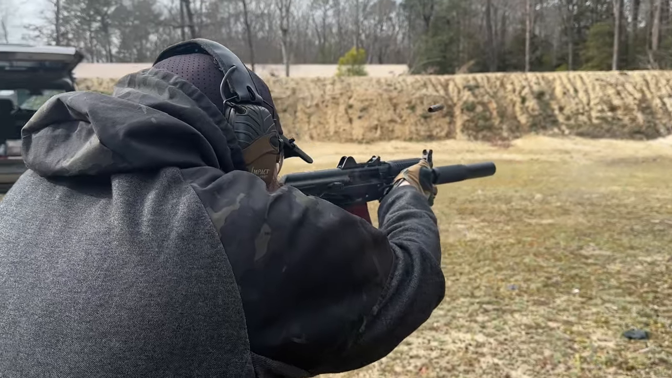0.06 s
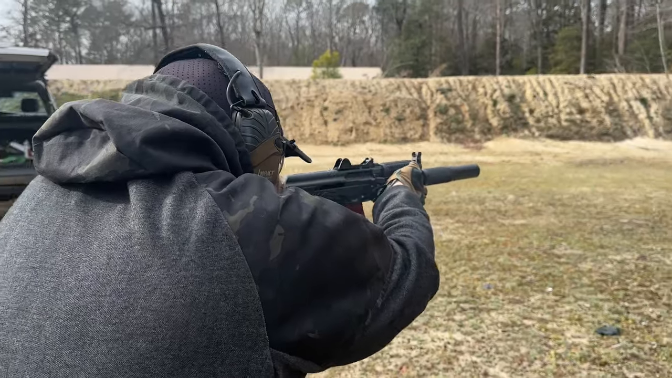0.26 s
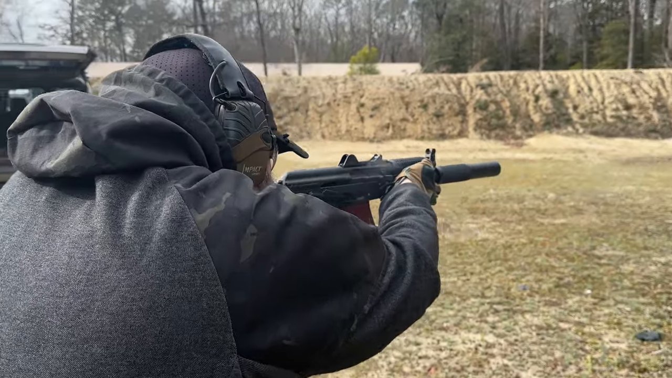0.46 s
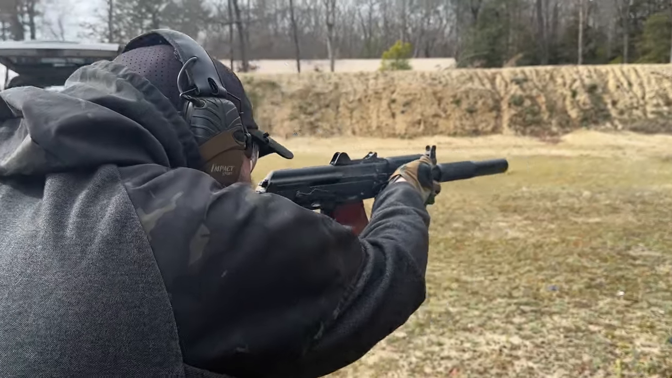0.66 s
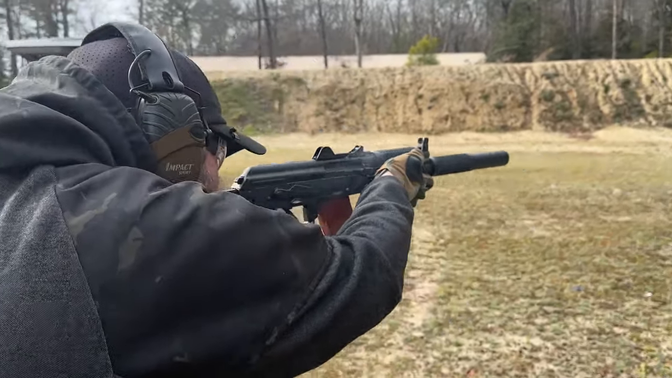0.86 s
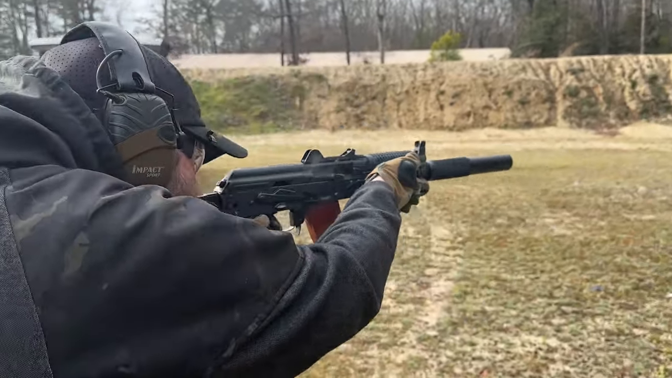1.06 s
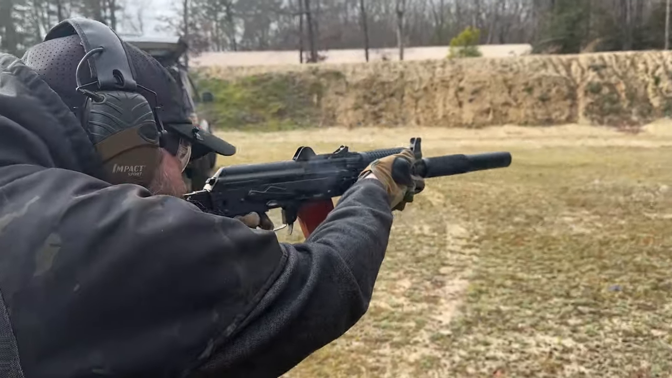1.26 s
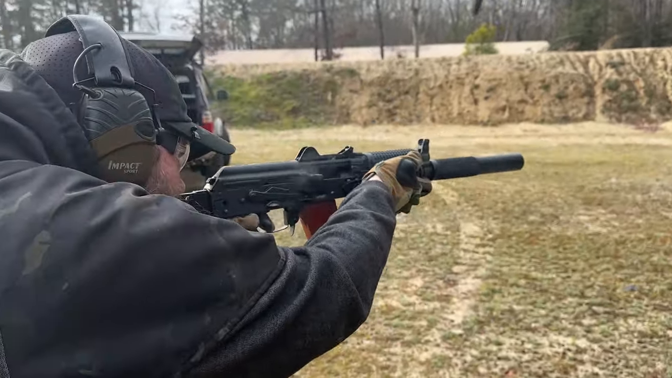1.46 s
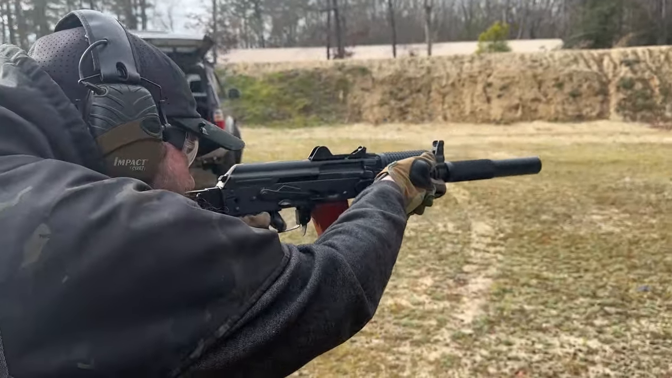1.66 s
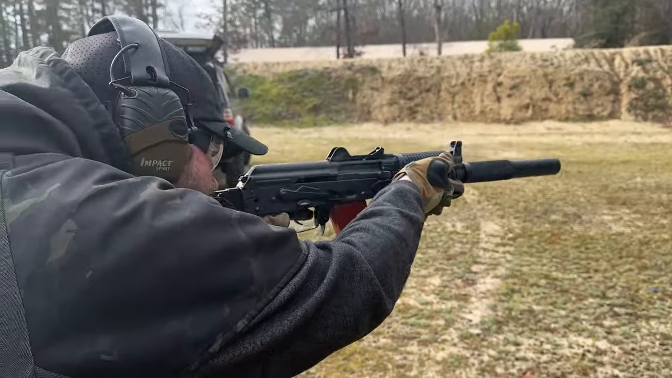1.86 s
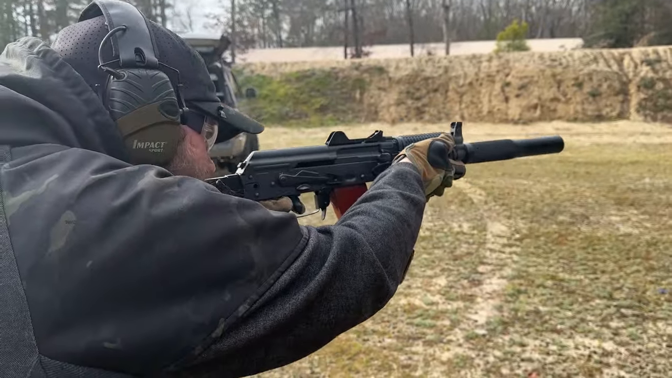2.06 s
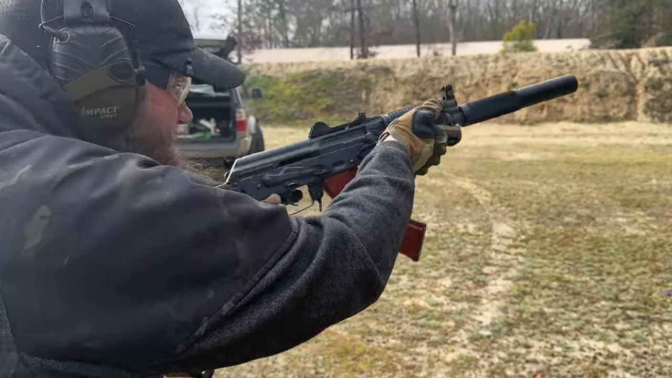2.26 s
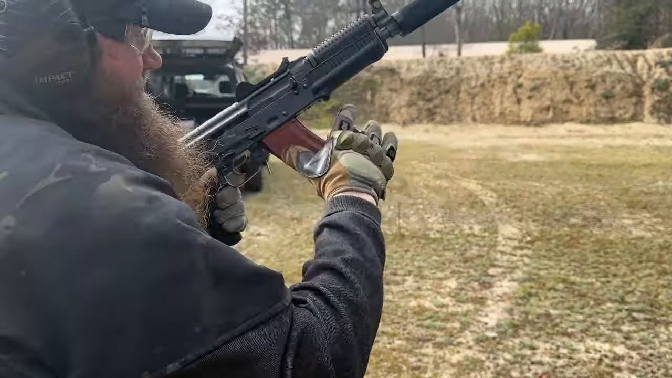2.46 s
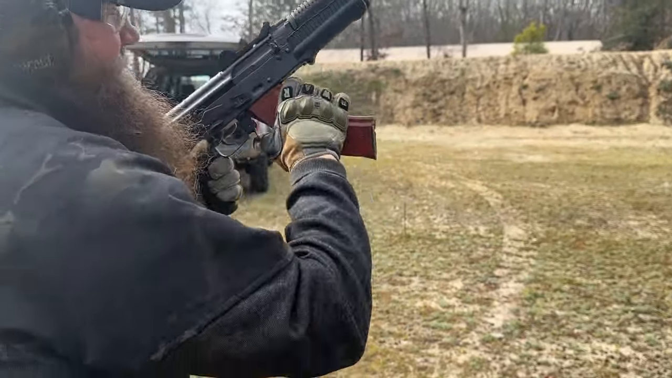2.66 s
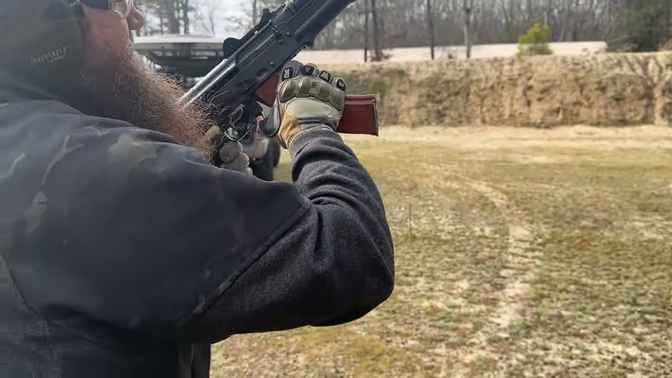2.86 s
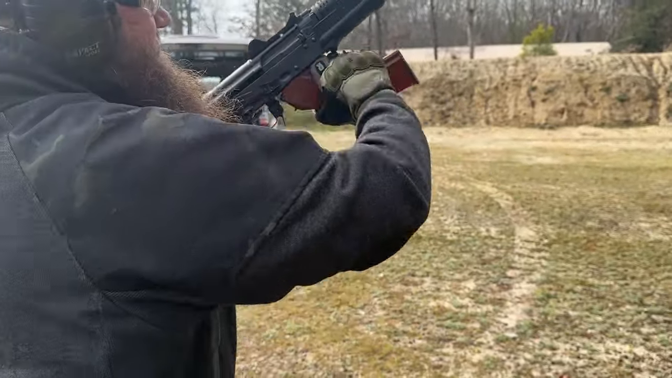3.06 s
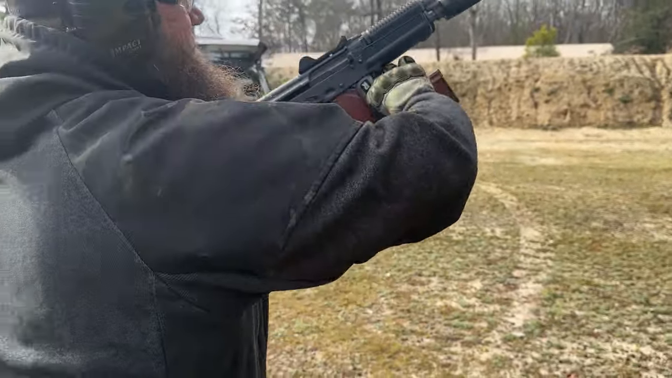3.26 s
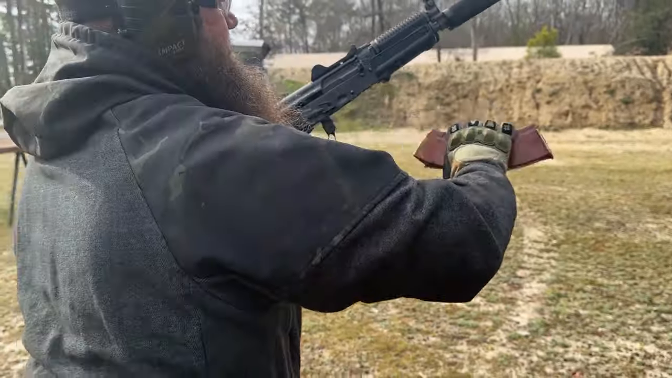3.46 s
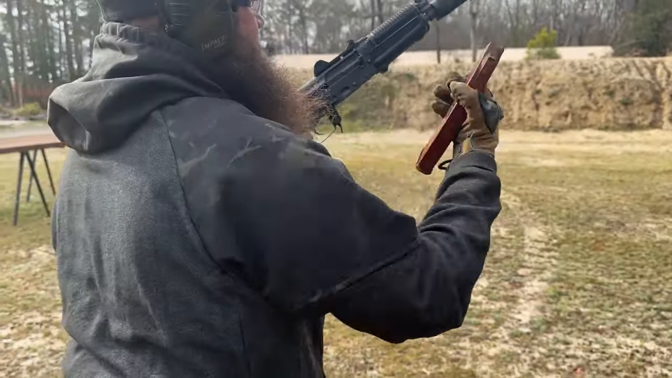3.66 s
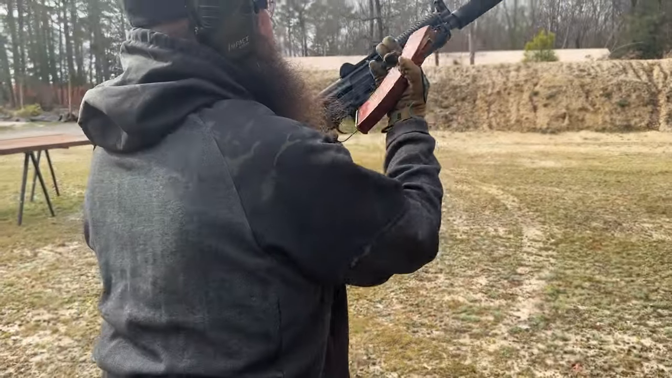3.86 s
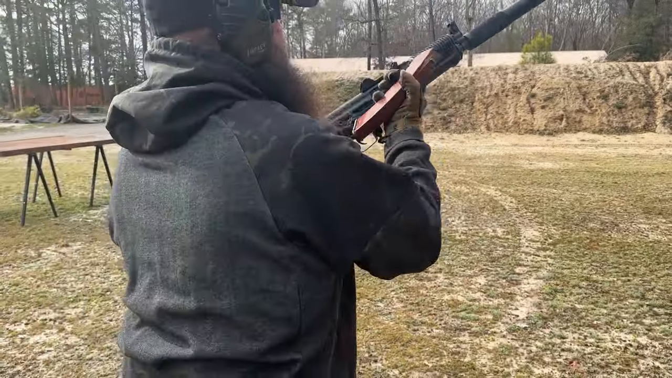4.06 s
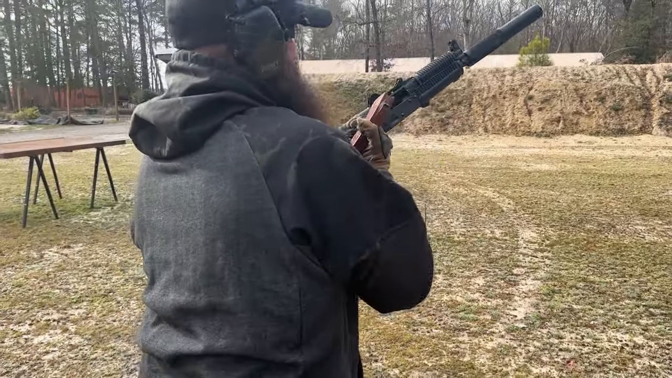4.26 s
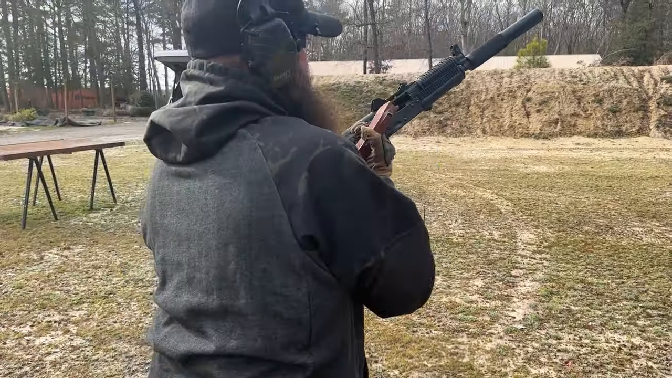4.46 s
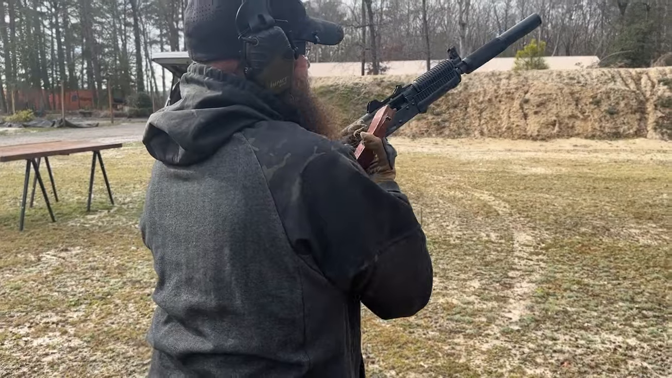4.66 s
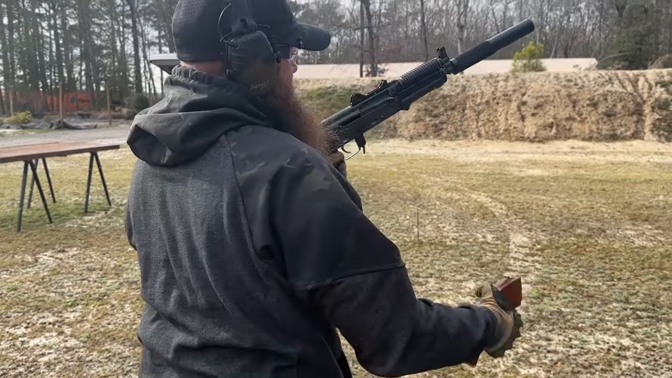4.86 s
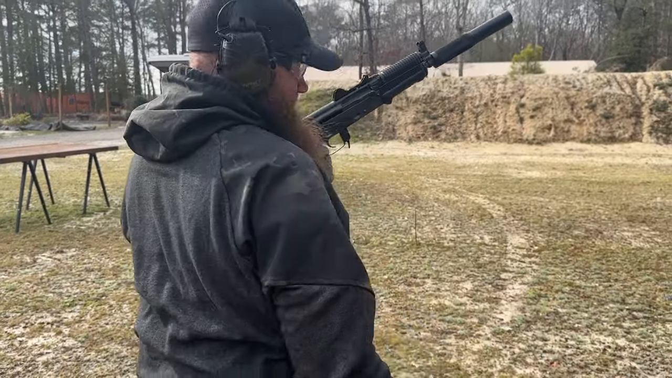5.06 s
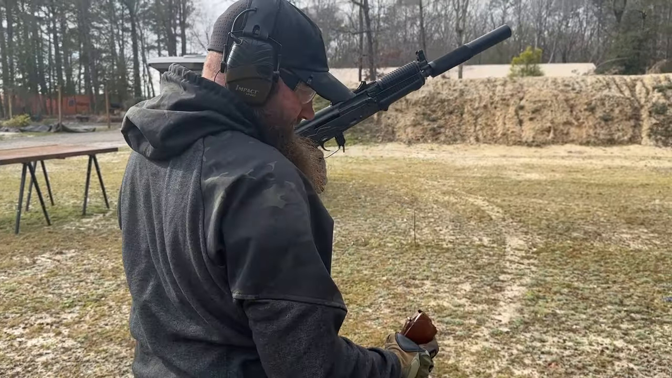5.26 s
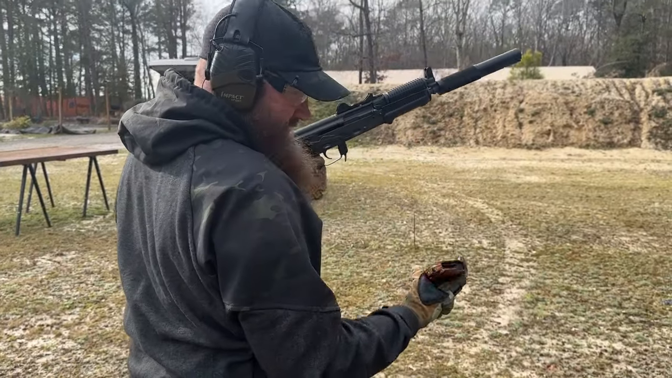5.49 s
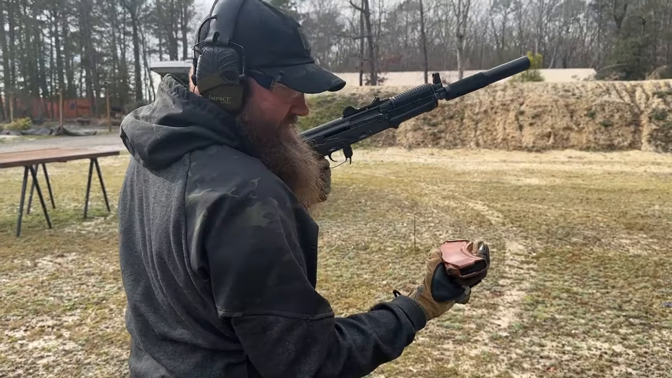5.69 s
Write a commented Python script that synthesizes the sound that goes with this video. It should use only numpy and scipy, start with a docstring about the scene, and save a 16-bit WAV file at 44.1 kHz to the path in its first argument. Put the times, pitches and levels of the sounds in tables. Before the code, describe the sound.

Seven rapid rifle shots overload a close microphone and echo off trees, followed by dry clicks, a magazine knock and two metallic bolt pulls.

```python
"""Suppressed rifle on an open range

Seven quick shots, each a blast, a hiss of gas and a cycling bolt, badly overload a close microphone.
Earth banks throw each shot back and the woods roll on for seconds. The action clicks empty, the
magazine is knocked loose and pulled out, and the bolt is racked twice, while sleeves rustle in still air.
The sound opens on a quieter snatch of a shot and a short silent gap."""
import sys
import numpy as np
from scipy import signal
from scipy.fft import irfft, next_fast_len
from scipy.io import wavfile
from scipy.ndimage import uniform_filter1d

SR = 44100
rng = np.random.default_rng(int(sys.argv[2]) if len(sys.argv) > 2 else 0)


def wav_record(signal):
    """Record a signal, one row per channel, as 16-bit PCM in the file named by sys.argv[1]."""
    frames = np.transpose(np.atleast_2d(signal))
    bounded = np.clip(frames, -1, 1)
    # unit amplitude maps onto the largest positive 16-bit level
    quanta = np.round(bounded * 32767).astype(np.int16)
    wavfile.write(sys.argv[1], SR, quanta)


N = 252648
TIME = np.arange(N) / SR

# the shots, starting with the opening snatch: t/s, level/dB
SHOTS = [(-.009, 0.5), (0.1846, -1.5), (0.383, -2.5), (0.601, -0.5), (.773, -3.5), (1.0141, -4),
         (1.2057, -3), (1.4244, -0.5)]
# notes of the parts that the moving bolt sets ringing: f/Hz, level/dB, time to fade 60 dB/s
CARRIER_NOTES = [(2595, -4, 0.34), (4690, -4, 0.06), (7050, 0, 0.062), (9700, -5.5, 0.13)]
def gunfire(shared_db=-9.5, varied_db=-9, carrier_delay_s=.014):
    """Every shot meets the same ground, banks and trees, a little differently as the muzzle moves."""
    shared = woods_echo()
    add(shared, 0, amp(shared_db) * (blast() + bolt_thumps()))
    out = np.zeros(N)
    for s, db in SHOTS:
        add(out, s, amp(db) * shared)
        add(out, s, amp(db + varied_db) * (blast() + bolt_thumps()))
        add(out, s, amp(db) * gas_and_bolt_hiss())
        add(out, s + carrier_delay_s, amp(db) * ring(CARRIER_NOTES))
    return out


# routes of the blast, direct and off the banks: delay/s, level/dB, f/Hz, decay/s,
# time between repeats/s, loss at the first repeat/dB, pitch shift per repeat/octaves
BLAST_PATHS = [(.001, 15, 904.5, 0.0084, .019, 0.9, 0.21), (.043, 13, 435, 0.0092, .011, 4, -0.32),
               (.102, 11.5, 434, .008, 0.018, 3.5, -.3), (.141, 4, 821, .016, .02, 5, -0.59)]
def blast(arrivals=5, body_hz=195.4, body_db=-17, body_decay_s=.045):
    """On each route the blast flutters between nearby surfaces, fading ever faster, over a low boom."""
    out = np.zeros(SR // 2)
    for delay, db, hz, decay, every, loss_db, shift in BLAST_PATHS:
        for k in range(arrivals):
            add(out, delay + k * every, amp(db - k ** 2 * loss_db) * pulse(hz * 2 ** (k * shift), decay))
        add(out, delay, amp(db + body_db) * pulse(body_hz, body_decay_s))
    return out


# the bolt hits its rear stop, then its front one: t after the shot/s, rush level/dB, thump level/dB
BOLT_STOPS = [(0.03, 2, 8), (0.089, 9, 4.5)]
def bolt_thumps(hz=68, decay_s=.013, head_start_s=.006):
    """The bolt gives a deep thump at each end of its travel."""
    out = np.zeros(SR // 2)
    for delay, _, db in BOLT_STOPS:
        add(out, delay - head_start_s, amp(db) * pulse(hz, decay_s))
    return out


# tone of the gas jet's hiss: f/Hz, level/dB
JET_TONE = [(60, -22), (400, 2), (900, 0), (1600, 5), (3000, 4.5), (5000, -1.5), (8000, -7), (12000, -6.5),
            (16000, -10.5)]
def gas_and_bolt_hiss(jet_db=7, hold_s=.019, fall_db_per_s=169.5, rush_half_width_s=.0079):
    """The gas jet holds, then dies away, while the bolt rushes back and forth."""
    t = TIME[:SR // 3]
    power = amp(jet_db - fall_db_per_s * np.maximum(t - hold_s, 0)) ** 2
    for delay, rush_db, _ in BOLT_STOPS:
        power += amp(rush_db) ** 2 * np.exp(-((t - delay) / rush_half_width_s) ** 2)
    return np.sqrt(power) * noise(JET_TONE, len(t))


# tone and fading of the echo from the trees: f/Hz, level/dB, loss/(dB per s)
WOODS_TONE = [(30, -24.5, 2), (100, -16.5, 5.5), (200, -5, 7.5), (400, -1, 7.5), (650, -2, 7),
              (1030, -5.5, 7), (1800, -8.5, 9), (3140, -11, 20.5), (4900, -24, 28), (9250, -37.5, 35),
              (16000, -45, 33.5)]
def woods_echo(onset_s=.17, spreading=1.74):
    """One shot comes back from ever farther trees, thinning with distance and losing its treble."""
    hz, t, spectrum = signal.stft(rng.standard_normal(N), SR, nperseg=512)
    table = np.array(WOODS_TONE)
    tone = normalise(amp(look_up(table[:, [0, 1]], hz)))[:, None]
    loss_db = look_up(table[:, [0, 2]], hz)[:, None] * t
    echo = signal.istft(spectrum * tone * amp(-loss_db), SR, nperseg=512)[1][:N]
    distance = TIME / onset_s
    return echo * np.minimum(distance, 1) ** 2 / np.maximum(distance, 1) ** spreading


# tone of the rifle's clattering steel body: f/Hz, level/dB
CLATTER_TONE = [(60, -27.5), (350, -27.5), (750, -14.5), (1030, 2), (1800, 8.5), (3200, 4), (4500, -2.5),
                (8000, -7), (12000, -10), (16000, -20)]
def clack(tilt_db, decay_s, scatter_db=-29, scatter_s=.017):
    """Steel hits steel: a clatter that dies fast, then scatters off the shooter and the ground."""
    t = TIME[:8192]
    fade = np.exp(-t / decay_s) + amp(scatter_db) * np.exp(-t / scatter_s)
    return noise(CLATTER_TONE, len(t), tilt_db) * fade


# notes of the small levers inside: f/Hz, level/dB, time to fade 60 dB/s
LEVER_NOTES = [(1728, -14, 0.097), (2804, 0, 0.028), (3740, -10, 0.044), (4570, -17.5, 0.017),
               (5210, -16, 0.051), (5570, -8.5, 0.025), (8170, -16.5, .03)]
def with_levers(hit, ring_db):
    """A hit shakes the small levers, which add their ringing to it."""
    add(hit, 0, amp(ring_db) * ring(LEVER_NOTES))
    return hit


# the trigger resets between shots: t/s, level/dB
TRIGGER_RESETS = [(0.3209, 10.5), (0.535, 8), (0.7422, 11.5), (.928, 5), (1.1626, 7), (1.365, 6.5),
                  (1.5815, 8)]
# dry clicks of the hammer and catches: t/s, level/dB, treble tilt/(dB per octave)
HAMMER_CLICKS = [(1.629, 6.5, 4), (1.638, 4.5, 7), (1.7885, -10.5, -1), (1.9872, -21.5, 6.5),
                 (2.2126, -8.5, -.5), (2.757, -40.5, -3.5), (3.9125, -36, -2.5), (4.032, -42, -4),
                 (4.2572, -38.5, 7), (4.3091, -45, 3.5)]
def snaps(reset_tilt_db=2.5, decay_s=.0031):
    """Trigger, hammer and catches snap over and ring."""
    resets = [(s, db, reset_tilt_db) for s, db in TRIGGER_RESETS]
    out = np.zeros(N)
    for s, db, tilt_db in [*resets, *HAMMER_CLICKS]:
        snap = amp(-2) * clack(tilt_db, decay_s)
        add(out, s, amp(db) * with_levers(snap, ring_db=-3))
    return out


def knock(tilt_db, decay_s, hollow_hz, hollow_db):
    """A clack with a hollow note, which shakes the levers."""
    hit = clack(tilt_db, decay_s) + amp(hollow_db) * pulse(hollow_hz, decay_s, spread=2.2, size=8192)
    return with_levers(hit, ring_db=-21)


# knocks on the magazine: t/s, level/dB, treble tilt/(dB per octave), hollow note f/Hz, its share/dB
MAGAZINE_KNOCKS = [(2.4919, -18.5, -4, 1672, 9), (2.512, -24.5, -4.5, 1698, -14),
                   (2.8801, -29.5, -12, 1740, -13), (3.034, -27, -10.5, 1656, 7),
                   (3.040, -10, -5.5, 1583, 4), (3.046, 3.5, 2, 1500, -10.5),
                   (3.344, -32.5, -5.5, 1260, 14.5), (3.355, -22.5, -9.5, 1259, -2),
                   (5.188, -46.5, -15, 1143, 0)]
def magazine(decay_s=.0039):
    """The hollow magazine is knocked loose and bumps on its way out."""
    out = np.zeros(N)
    for s, db, tilt_db, hollow_hz, hollow_db in MAGAZINE_KNOCKS:
        add(out, s, amp(db) * knock(tilt_db, decay_s, hollow_hz, hollow_db))
    return out


# the bolt's carrier catches as it is racked (worked by hand) twice: t/s, level/dB
RACK_CATCHES = [(4.058, -34.5), (4.072, -10.5), (4.078, -9), (4.095, -7.5), (4.107, -6.5), (4.1301, -1),
                (4.143, 2.5), (4.687, -29.5), (4.7025, -10), (4.727, -8.5), (4.734, -6.5), (4.7446, -1.5),
                (4.756, -7), (4.766, 7), (4.775, 2.5)]
def racking(base_tilt_db=1.5, brightening=.1):
    """The carrier catches harder and harder along each stroke; a harder catch is brighter."""
    out = np.zeros(N)
    for s, db in RACK_CATCHES:
        tilt_db = base_tilt_db + brightening * db
        add(out, s, amp(db) * knock(tilt_db, decay_s=.0062, hollow_hz=1328, hollow_db=-6))
    return out


# notes of the rifle's steel and of its spring: f/Hz, level/dB, time to fade 60 dB/s
STEEL_NOTES = [(1350, -6, 0.13), (1880, -8.5, 0.12), (2126, -24, 0.78), (2680, -6.5, .09), (3360, 7.5, .12),
               (3460, 8.5, 0.13), (4000, -4.5, 0.099), (5180, 10.5, .07), (6400, -19.5, .1),
               (10890, -2, .1)]
SPRING_NOTES = [(2600, -0.5, 2.1), (3340, -11.5, 1.4), (3300, 8.5, 1), (3250, 0.5, 1.8), (4630, -17, 1.1)]
# heavy stops that jolt the rifle: t/s, thud level/dB, steel level/dB, spring level/dB
HEAVY_STOPS = [(1.632, -18, -21, -52), (3.045, -27, -52.5, -88.5), (4.147, -19, -30, -84.5),
               (4.685, -55, -44, -70), (4.778, -1.5, -23.5, -53.5)]
def jolts(push_s=.0043):
    """The whole rifle stops against hands and shoulder: a deep push, a rebound and ringing metal."""
    progress = TIME[:SR // 10] / push_s
    thud = soften((1 - progress) * np.exp(-progress), hz=150)
    out = np.zeros(N)
    for s, thud_db, steel_db, spring_db in HEAVY_STOPS:
        add(out, s, amp(thud_db) * thud)
        add(out, s, amp(steel_db) * ring(STEEL_NOTES))
        add(out, s, amp(spring_db) * ring(SPRING_NOTES))
    return out


# steel slides on steel between the knocks: t/s, level/dB, length/s
SLIDE_STROKES = [(3.014, -44, 0.024), (3.328, -42, 0.035), (4.043, -23, 0.17), (4.675, -21, 0.062),
                 (4.685, -23, 0.16)]
def slides():
    """The magazine and the bolt's carrier grate along the rifle's body."""
    motion = np.zeros(N)
    for s, db, length in SLIDE_STROKES:
        add(motion, s, amp(db) * swell(length))
    return motion * stick_and_slip(depth_db=4, grain_samples=90) * noise(CLATTER_TONE, N, tilt_db=-3)


def with_range_echo(x, echo_db=-47, onset_s=.15, spreading=2.3, bright_db=-4, bright_s=.18):
    """Close sounds come back faintly from the banks and trees; the treble dies first."""
    t = TIME[:2 * SR]
    distance = t / onset_s
    dull = soften(rng.standard_normal(len(t)), hz=3200)
    bright = amp(bright_db) * np.exp(-t / bright_s) * rng.standard_normal(len(t))
    tail = (dull + bright) * np.minimum(distance, 1) / np.maximum(distance, 1) ** spreading
    return x + amp(echo_db) * signal.fftconvolve(x, tail / np.linalg.norm(tail))[:N]


# tone of rubbing cloth: f/Hz, level/dB
CLOTH_TONE = [(300, -8.5), (1000, -1), (2000, 9.5), (3200, 5), (4000, -5.5), (4700, 2.5), (6300, -2.5),
              (8500, -9.5), (11200, -2.5), (13000, -5), (16000, -11)]
# sweeps of the arm: middle t/s, level/dB, length/s
ARM_SWEEPS = [(2.329, -59, 0.29), (2.555, -58, 0.18), (3.05, -55, 0.46), (3.375, -63.5, 0.55),
              (3.39, -56, 0.12), (3.71, -62, 0.47), (3.884, -62, 0.089), (4.24, -55, .14), (5.5, -80, .5)]
def sleeve(ticks_per_s=30, tick_db=12, tick_s=.0008, rest_db=-84):
    """Cloth slides in small uneven catches, with stray ticks, as the arm moves."""
    ticks = (rng.random(N) < ticks_per_s / SR) * amp(tick_db + 3 * rng.standard_normal(N))
    ticks = signal.oaconvolve(ticks, np.exp(-TIME[:512] / tick_s))[:N]
    motion = np.full(N, amp(rest_db))
    for s, db, length in ARM_SWEEPS:
        add(motion, s - length / 2, amp(db) * swell(length))
    return noise(CLOTH_TONE, N) * (stick_and_slip(depth_db=.5, grain_samples=160) + ticks) * motion


# soft scuffs: t/s, level/dB, centre f/Hz, length/s
GLOVE_SCUFFS = [(2.899, -46, 2000, 0.045), (5.283, -63, 1995, 0.078), (5.389, -60, 2096, 0.053),
                (5.42, -55, 1675, 0.043), (5.531, -60, 2283, 0.043)]
def glove():
    """A glove brushes the empty magazine in short strokes."""
    out = np.zeros(N)
    for s, db, hz, length in GLOVE_SCUFFS:
        stroke = swell(length)
        tone = [(hz / 2, -18), (hz, 0), (hz * 2, -18), (hz * 6, -35)]
        add(out, s, amp(db) * stroke * noise(tone, len(stroke)))
    return out


# tone of still outdoor air: f/Hz, level/dB
AIR_TONE = [(20, -7.5), (90, -2.5), (145, -4.5), (230, -12), (600, -13.5), (1500, -24.5), (3000, -29),
            (6000, -36.5), (16000, -38.5)]
def air(level_db=-60):
    """A faint, steady, low hush lies under everything."""
    return amp(level_db) * noise(AIR_TONE, N)


def amp(db):
    """Turns decibels into a gain."""
    return 10 ** (np.asarray(db) / 20)


def normalise(x):
    """Scales a signal to an average power of 1."""
    return x / np.sqrt(np.mean(x ** 2) + 1e-20)


def look_up(points, hz):
    """Reads between (frequency, value) points, spaced by pitch."""
    f, value = np.transpose(points)
    return np.interp(np.log(hz + 1), np.log(f + 1), value)


def add(mix, s, sound):
    """Mixes a sound in at s seconds, dropping what does not fit."""
    start = round(s * SR)
    sound = sound[max(-start, 0):]
    part = mix[max(start, 0):][:len(sound)]
    part += sound[:len(part)]


def noise(tone, size, tilt_db=0):
    """Noise of power 1 with a given tone, tilted by tilt_db per octave above 1 kHz."""
    padded = next_fast_len(size)
    hz = np.fft.rfftfreq(padded, 1 / SR)
    octaves = np.log2(np.maximum(hz / 1000, 1))
    phases = np.exp(2j * np.pi * rng.random(len(hz)))
    gains = amp(look_up(tone, hz) + tilt_db * octaves)
    return normalise(irfft(phases * gains, padded)[:size])


def pulse(hz, decay_s, spread=3.9, size=4096, roughness=.97):
    """A rough dying note, kept to the band from hz / spread to hz * spread."""
    t = TIME[:size]
    wander = roughness * np.cumsum(rng.standard_normal(size)) * np.sqrt(hz / SR)
    envelope = np.exp(-t / decay_s) * (1 - np.exp(-2 * hz * t))
    note = np.sqrt(2) * np.sin(2 * np.pi * hz * t + wander) * envelope
    edges = [hz / spread, min(hz * spread, SR / 3)]
    return signal.sosfilt(signal.butter(2, edges, "bandpass", fs=SR, output="sos"), note)


def ring(notes):
    """Struck metal rings with several pure notes, each fading at its own rate."""
    length_s = min(1.5 * max(fade_s for _, _, fade_s in notes), 2)
    t = TIME[:int(SR * length_s)]
    return sum(amp(db - 60 * t / fade_s) * np.sin(2 * np.pi * (hz * t + rng.random()))
               for hz, db, fade_s in notes)


def stick_and_slip(depth_db, grain_samples):
    """The uneven loudness of one surface dragging over another."""
    wobble = normalise(uniform_filter1d(rng.standard_normal(N), size=grain_samples))
    return normalise(amp(depth_db * wobble))


def swell(length_s):
    """The smooth rise and fall of one stroke."""
    return np.hanning(int(length_s * SR))


def soften(x, hz):
    """Takes off the treble above a frequency."""
    return signal.sosfilt(signal.butter(2, hz, fs=SR, output="sos"), x)


def colour(x, tone, size=4096):
    """Gives a sound a tone, with a filter that rings only after each hit, never before."""
    log_gain = np.log(amp(look_up(tone, abs(np.fft.fftfreq(size, 1 / SR)))))
    taps = np.fft.ifft(np.exp(np.conj(signal.hilbert(log_gain)))).real
    return signal.oaconvolve(x, taps[:size // 2])[:N]


def scene():
    """Shots, gun handling and quiet air meet at one microphone."""
    shots = gunfire()
    handling = snaps() + magazine() + racking() + jolts() + slides()
    return (shots + with_range_echo(handling) + sleeve() + glove() + air())[None]


# tone of the microphone's opening, and of the electronics after the overload: f/Hz, level/dB
PORT_TONE = [(1000, 0), (2050, -0.5), (2400, -2.5), (2850, -1.5), (3450, 1), (3950, -3.5), (4700, 0.5),
             (6300, -1.5), (7300, 1.5), (9000, -1.5)]
ELECTRONICS_TONE = [(10, -3), (30, 0), (1900, 0), (2380, -2.5), (2900, .7), (4000, -1.5), (4800, 0),
                    (11000, 0), (16000, -2.5)]
# the silence after the opening snatch: start t/s, end t/s
SILENT_GAP = (.069, .2058)
def record(dry, ceiling=.655, snatch_db=-5.5, top_hz=15950):
    """The microphone flattens loud waves; the opening is turned down and cut off; the top treble goes."""
    drive = signal.resample_poly(colour(dry[0], PORT_TONE), 2, 1) / ceiling  # at twice the sample rate
    flattened = ceiling * drive / (1 + drive ** 4) ** .25
    out = colour(signal.resample_poly(flattened, 1, 2), ELECTRONICS_TONE)
    gap_start, gap_end = SILENT_GAP
    out *= np.where(TIME < gap_start, amp(snatch_db), TIME > gap_end)
    treble_cut = signal.firwin(255, top_hz, window=("kaiser", 9), fs=SR)
    return signal.oaconvolve(out, treble_cut, "same")[None]


dry = scene()
out = record(dry)
wav_record(out)
```